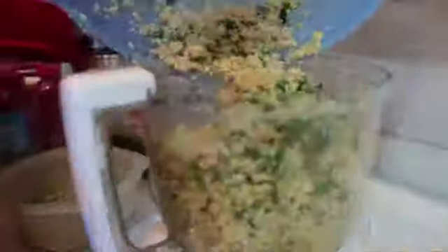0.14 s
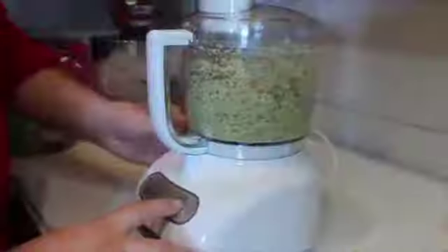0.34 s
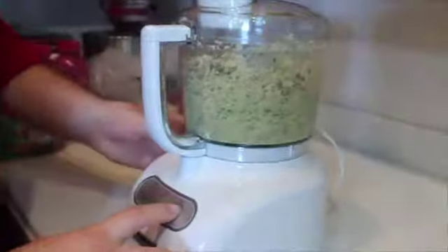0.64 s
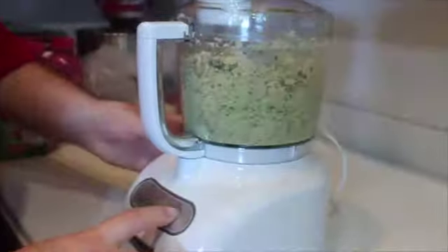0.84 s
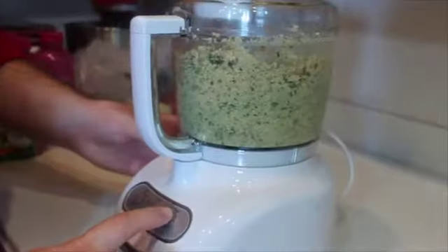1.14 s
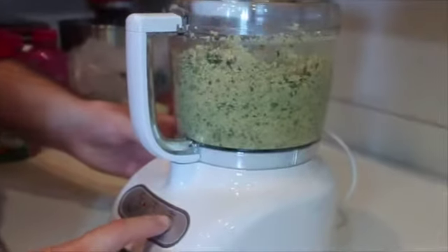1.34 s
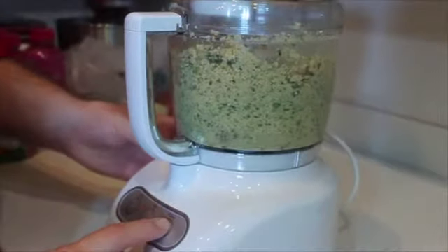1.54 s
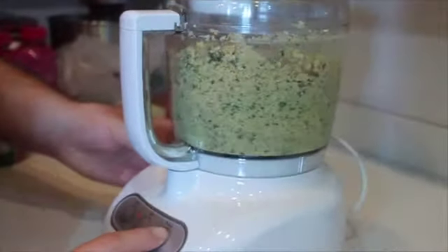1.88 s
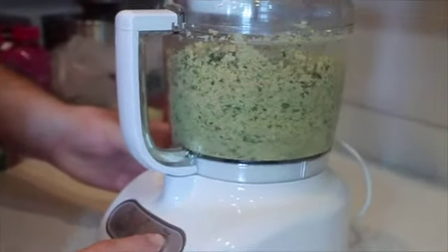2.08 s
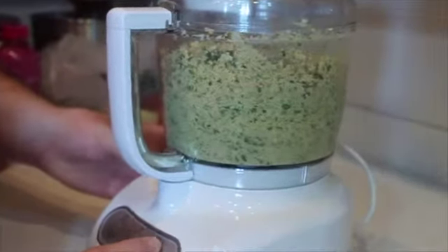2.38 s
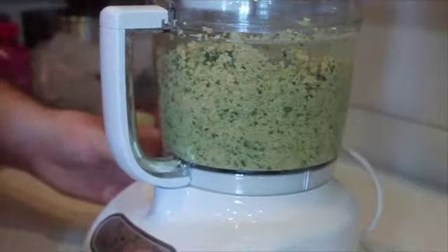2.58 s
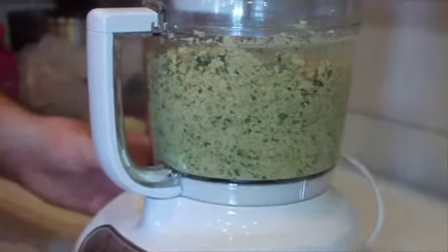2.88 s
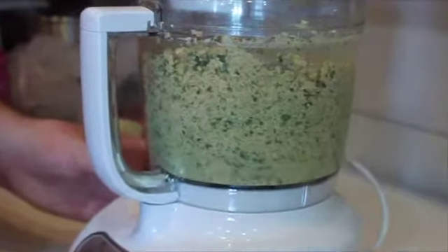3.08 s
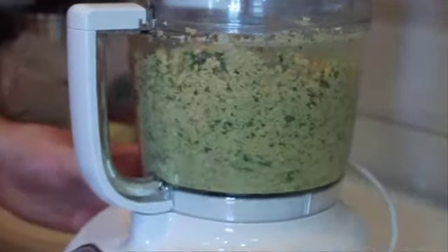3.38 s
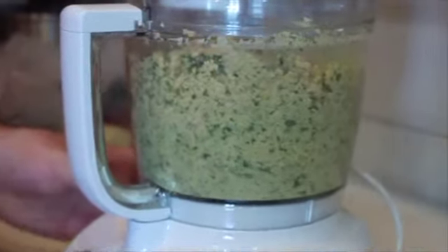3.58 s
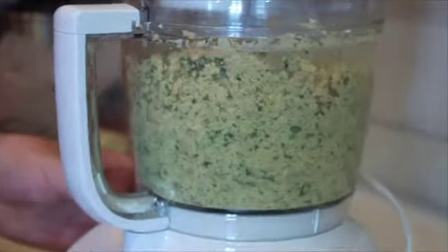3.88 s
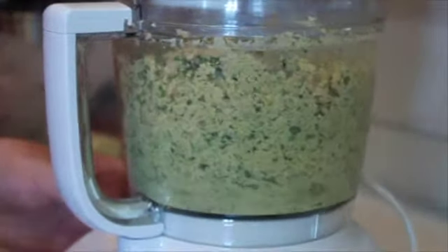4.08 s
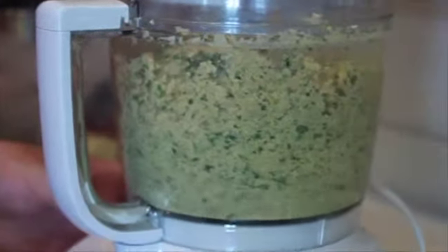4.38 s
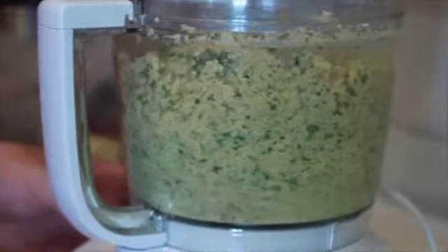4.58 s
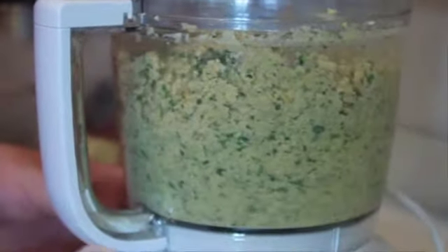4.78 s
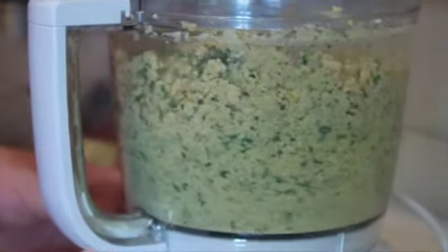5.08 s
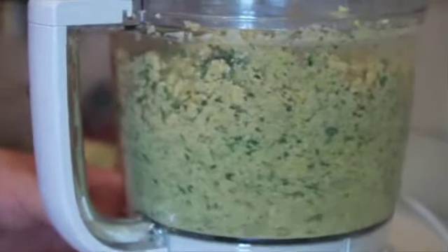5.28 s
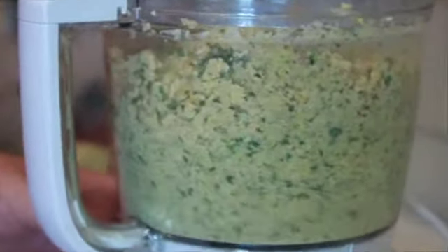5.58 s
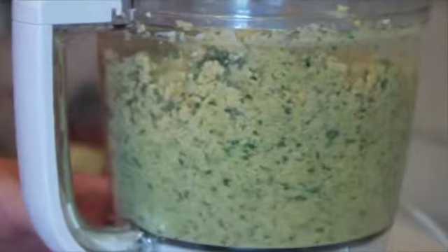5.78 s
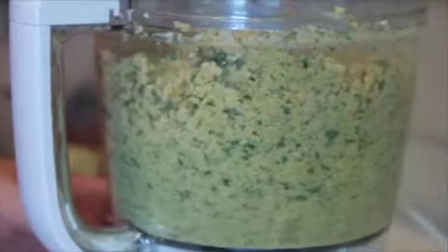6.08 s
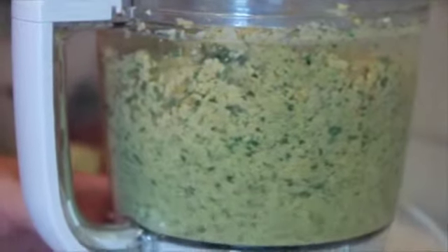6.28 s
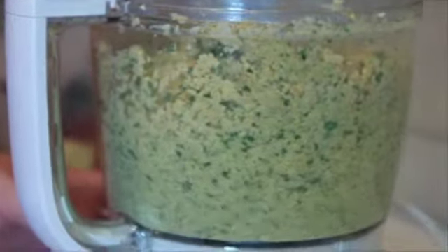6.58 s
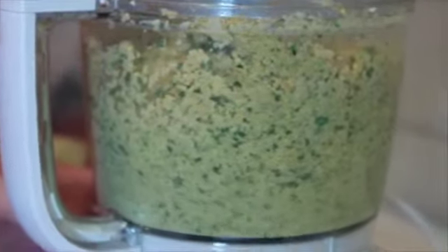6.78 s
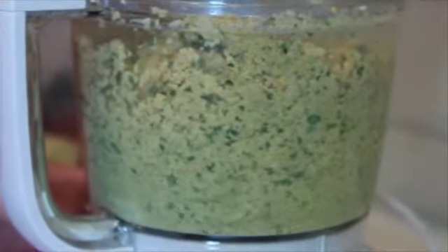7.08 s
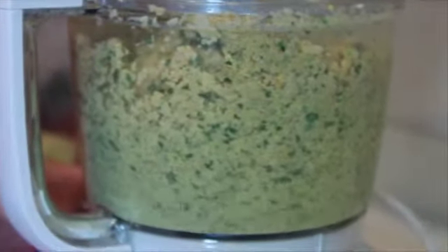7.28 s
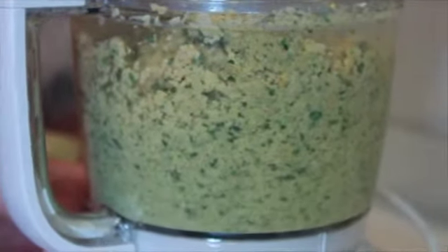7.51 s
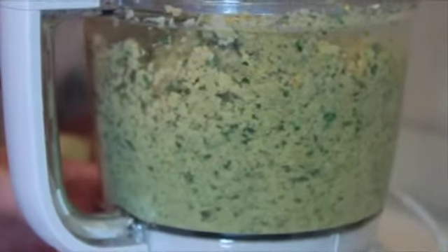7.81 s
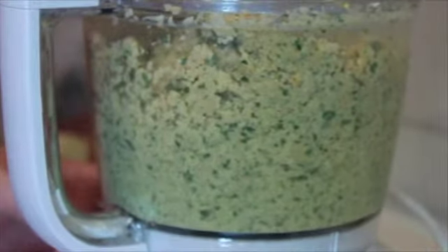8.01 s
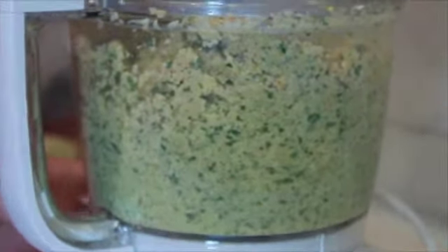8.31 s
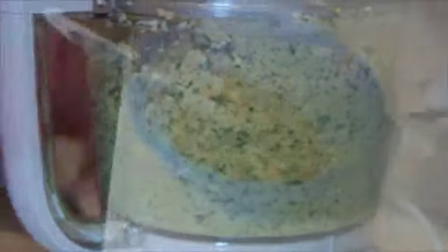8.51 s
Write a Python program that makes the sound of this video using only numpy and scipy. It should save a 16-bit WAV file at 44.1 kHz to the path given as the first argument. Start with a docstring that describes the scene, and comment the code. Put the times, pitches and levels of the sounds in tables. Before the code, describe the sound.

In a small tiled kitchen, soft utensil scrapes and knocks come first, then a food processor is pulsed three times, each burst starting with a button click and a low groan and sagging as the blade coasts down. A fourth start holds as a steady hum, whine and gritty chopping roar. A loud click cuts it off, leaving a brief run-down, small ticks and quiet room noise. Close microphone, same sound in both channels.

```python
"""A food processor with an induction motor is pulsed three times, then latched on, in a small tiled kitchen.
The blade flings a crumbly mixture at the plastic bowl: random impacts on noise excite the bowl's resonances.
The stator hums at multiples of twice the mains rate, rotor slots whine, and base and housing shake as noise.
Buttons click at starts and stops; between pulses the blade coasts down. Ticks, knocks, a few thin high tones
and room noise surround it. One microphone feeds both channels."""
import sys
import numpy as np
from scipy import signal
from scipy.fft import rfft, irfft, next_fast_len
from scipy.io import wavfile
from scipy.ndimage import uniform_filter1d

SR = 44100
rng = np.random.default_rng(int(sys.argv[2]) if len(sys.argv) > 2 else 0)


def output_pcm(signal):
    """Save a mono or channel-first signal as 16-bit PCM at the path in sys.argv[1].

    Samples are clipped to [-1, 1] before scaling.
    """
    pcm = np.clip(np.atleast_2d(signal).T, -1, 1) * 32767
    wavfile.write(sys.argv[1], SR, np.round(pcm).astype(np.int16))


N = 381465
TIME = np.arange(N) / SR
MAINS_HZ = 60


def amp(db):
    """Level law: decibels to amplitude gain."""
    return 10 ** (np.asarray(db) / 20)


def unit(x):
    """Normalisation: scale to rms 1."""
    return x / np.sqrt(np.mean(x ** 2) + 1e-20)


def in_time(rows):
    """Linear interpolation: columns of a table joined in time."""
    seconds, *columns = np.transpose(rows)
    return [np.interp(TIME, seconds, column) for column in columns]


def drift(rate_hz):
    """Slow random fluctuation: noise through a two-pole low-pass, rms 1."""
    step = 40  # samples between computed points
    r = np.exp(-2 * np.pi * rate_hz * step / SR)
    noise = rng.standard_normal(N // step + 2002)
    slow = signal.lfilter([1], [1, -2 * r, r * r], noise)[2000:]  # without the filter's onset
    return np.interp(np.arange(N) / step, np.arange(len(slow)), unit(slow))


def resonate(x, hz, width_hz):
    """Damped resonance: a two-pole filter with gain close to 1 at its peak."""
    r = np.exp(-np.pi * width_hz / SR)
    numerator = [(1 - r * r) / 2, 0, (r * r - 1) / 2]
    denominator = [1, -2 * r * np.cos(2 * np.pi * hz / SR), r * r]
    return signal.lfilter(numerator, denominator, x + 1e-18)


def through(x, modes):
    """Modal superposition: parallel resonances with alternating signs."""
    return sum(amp(db) * resonate(x, hz, width) * (-1) ** k for k, (hz, width, db) in enumerate(modes))


def colour(sources, spectrum, patchy_db):
    """Band synthesis: third-octave bands dealt from two sources, each with its level and flicker; rms 1."""
    hz, db = np.transpose(spectrum)
    out = 0
    edges = 22 * 2 ** np.arange(0, 9.7, 1 / 3)
    for k, (low, high) in enumerate(zip(edges, edges[1:])):
        if low > hz[0] / 1.3 and high < hz[-1] * 1.3:
            bandpass = signal.butter(2, [low, high], "band", fs=SR, output="sos")
            band = signal.sosfilt(bandpass, sources[k % 2])
            centre_db = np.interp(np.log(low * high) / 2, np.log(hz), db)
            out = out + band * amp(centre_db + patchy_db * drift(13.4))
    return unit(out)


def highpass(x, order, hz):
    """Spectral tilt: a Butterworth high-pass."""
    return signal.sosfilt(signal.butter(order, hz, "high", fs=SR, output="sos"), x)


def tone(hz, db, waver_db, slip=0, locked=False):
    """Amplitude-modulated sinusoid: slip (cycles) blurs its pitch; locked lines start at a peak together."""
    phase = hz * TIME + (not locked) * rng.random() + slip
    return np.sqrt(2) * amp(db + waver_db * drift(3.0)) * np.cos(2 * np.pi * phase)


def burst(start_s, t60, rise=1e-4):
    """Exponential decay: noise that swells from start_s (rise is a time constant in s) and dies away."""
    out, start = np.zeros(N + SR), int(start_s * SR)
    age = TIME[:SR // 2]
    envelope = (1 - np.exp(-age / rise)) * amp(-60 * age / t60)
    out[start:start + SR // 2] = envelope * rng.standard_normal(SR // 2)
    return out[:N]


# Spectrum of the room noise. Each row: frequency in Hz, relative density in dB per Hz.
ROOM_SPECTRUM = [(15, -53), (25, -31), (48, -11), (296, 0.5), (330, -16.5), (422, -1), (510, -9.5),
                 (584, -9.5), (1010, -14), (1360, -12), (1680, -17.5), (4360, -24), (16500, -39)]
# Kitchen background over time. Each row: time in seconds, room noise level in dB, treble hiss level in dB.
ROOM_LEVEL = [(0, -79, -88), (.1, -87.5, -86), (.325, -83.5, -100), (.33, -62, -87), (2.8, -63, -84),
              (3.8, -62, -77), (7.4, -82, -90), (7.9, -69.5, -82), (8.2, -63.5, -88), (8.38, -63.5, -76),
              (8.5, -62.5, -68), (8.65, -62.5, -69)]


def background():
    """Broadband ambient noise: room noise, a mains hum from another appliance and a faint hiss."""
    level_db, treble_db = in_time(ROOM_LEVEL)
    hiss = unit(highpass(rng.standard_normal(N), 1, 3500))
    hum = tone(MAINS_HZ, -10, 0.92)  # dB relative to the room noise
    room = colour(rng.standard_normal((2, N)), ROOM_SPECTRUM, patchy_db=1.4)
    return amp(level_db) * (room + hum) + amp(treble_db) * hiss


def kitchen(x):
    """Reverberation by recirculation: eight feedback delays solved in frequency, treble dying sooner."""
    size = next_fast_len(N + SR)
    w = np.linspace(0, np.pi, size // 2 + 1)  # radians per sample
    t60 = 1 / (1 + 2.7 * w)  # seconds; 1 s at the lowest frequency
    lags = rng.uniform(.012, .035, 8) * SR
    loops = [amp(-60 * lag / SR / t60) * np.exp(-1j * w * lag) for lag in lags]
    response = sum(g / (1 - g) * (-1) ** k for k, g in enumerate(loops))
    return irfft(rfft(x, size) * response, size)[:N]


# Dry ticks of crumbs and plastic. Each row: start in seconds, level in dB before the high-pass.
TICKS = [(1.237, -48), (1.3204, -59), (2.4924, -64), (2.6184, -54), (3.758, -47), (7.7258, -62),
         (7.9029, -61.5), (7.9924, -64), (8.0012, -60.5), (8.0057, -54), (8.0341, -67), (8.0795, -64),
         (8.0884, -67), (8.105, -54), (8.1509, -61), (8.173, -51)]


def ticks():
    """Impulsive excitation: noise of 11 ms decay, high-passed to a bright tick."""
    return highpass(sum(amp(db) * burst(s, 0.011) for s, db in TICKS), 2, 4500)


# Soft knocks and scrapes of utensils. Each row: start in seconds, level in dB before the resonances,
# centre in Hz, width in Hz, rise time constant in seconds, 60 dB decay time in seconds.
KNOCKS = [(.005, -52, 480, 200, 0.0063, 0.12), (.055, -44, 1600, 900, 0.017, 0.1),
          (.06, -45, 2520, 900, 0.014, 0.082), (.065, -58, 6900, 1500, .012, .09),
          (.135, -66, 2800, 2500, 0.017, 0.17), (.21, -58, 1700, 700, 0.012, .12),
          (.27, -52, 500, 400, .005, 0.087), (.27, -54, 1400, 1500, 0.0042, 0.059),
          (1.354, -41, 2560, 1200, 0.00074, 0.05), (2.712, -45, 1840, 1790, .004, 0.25),
          (3.522, -36.5, 2050, 1500, .001, 0.15), (7.682, -42, 2180, 2000, 0.0022, 0.046),
          (8.173, -40.5, 1310, 1200, 0.0005, 0.024), (8.367, -53, 1500, 2500, .003, 0.11)]


def knocks():
    """Damped body response: short noise twice through one broad resonance."""
    out = 0
    for s, db, hz, width, rise, t60 in KNOCKS:
        once = resonate(burst(s, t60, rise), hz, width)
        out = out + amp(db) * resonate(once, hz, width)
    return out


# Button and latch clicks. Each row: start in seconds, body level in dB and crack level in dB (both before
# the modes), 60 dB decay time of the body burst in seconds.
BUTTONS = [(0.326, -39, -55, 0.13), (1.0122, -44, -36, 0.075), (1.45, -31.5, -38.5, 0.079),
           (2.242, -42, -34, 0.066), (2.868, -28.5, -41, 0.087), (3.3903, -34, -37, 0.14),
           (3.9055, -31, -37, 0.13), (3.9726, -21, -32, 0.038), (7.4397, -15.5, -24.5, 0.028)]
# Plastic modes rung by the snap. Each row: frequency in Hz, width in Hz, relative gain in dB.
BUTTON_MODES = [(700, 270, -14), (1240, 200, 0), (1840, 440, -4), (2510, 290, 3.5), (3280, 510, -3.5),
                (4400, 1540, -9.5)]
# Modes of the bright crack. Each row: frequency in Hz, width in Hz, gain in dB.
CRACK_MODES = [(6900, 2900, 4.5), (10000, 2800, 2), (13700, 1500, 6.5)]


def buttons():
    """Modal impact response: a snap rings the plastic modes and a shorter bright crack rides on top."""
    snap = sum(amp(db) * burst(s, t60) for s, db, crack_db, t60 in BUTTONS)
    crack = sum(amp(crack_db) * burst(s, 0.37 * t60) for s, db, crack_db, t60 in BUTTONS)
    return amp(6.5) * through(snap, BUTTON_MODES) + through(crack, CRACK_MODES)


# Motor current on and off. Each row: on in seconds, off in seconds, hum build-up time constant in seconds,
# bowl ring while coasting in dB, time to bring the blade to speed in seconds, level offset on reaching full
# speed in dB, start surge of the hum near 360 Hz in dB, start groan in dB, level step at switch-off in dB,
# coast-down loss in dB per second, delay of the groan peak in seconds, deep shudder in dB,
# base rumble in dB, coarse rattle in dB.
POWER = [(0.326, 1.007, 0.033, -30, .11, 0, -56, -46, 5, 61, 0.1, -49, -51, -12.5),
         (1.451, 2.261, 0.089, -30, 0.11, 0.5, -48, -42, 1, 42, 0.098, -47, -50, -11),
         (2.871, 3.389, 0.024, -30, 0.092, 0.4, -50, -40, 0.8, 41, 0.065, -44, -51.5, -12),
         (3.903, 7.439, 0.24, 0, 0.14, -2.5, -49.5, -50, -5.5, 35, 0.05, -61, -52.5, -20)]


def cycle_settings():
    """Piecewise-constant control: at each sample, the columns of the latest switch-on."""
    latest = np.searchsorted([row[0] for row in POWER], TIME) - 1
    return np.transpose(POWER)[:, np.maximum(latest, 0)]


def powered(rises, fall_s):
    """Exponential relaxation: climbs after each switch-on, dies after each switch-off."""
    out = np.zeros(N)
    for (on, off, *_), rise in zip(POWER, np.broadcast_to(rises, len(POWER))):
        climb = (TIME > on) * (1 - np.exp(-np.abs(TIME - on) / rise))
        out += climb * np.exp(-np.maximum(TIME - off, 0) / fall_s)
    return out


def coast_change(off, step_db, loss):
    """Level decay in dB: a quick step, up or down, at switch-off, then a fall that slows."""
    coast = np.maximum(TIME - off, 0)
    early_db = -14.5 * (1 - np.exp(-coast / 0.13))
    return step_db * np.minimum(coast / 0.018, 1) + early_db - loss * coast


# Thin high tones that throb after the last stop. Each row: frequency in Hz, rms level in dB before the throb.
THIN_TONES = [(6062, -87), (6810, -85), (7176, -95), (7940, -95), (8705, -93), (10584, -98), (12107, -95),
              (12473, -92), (13620, -93), (13986, -89)]


def thin_tones():
    """Common amplitude modulation: fixed high tones switch on and off in step, 16.7 times a second."""
    swing = np.cos(2 * np.pi * 16.7 * (TIME - 7.622))  # peaks at 7.622 s
    throb = np.clip(1.5 * swing + .6, 0, 1)
    heard = (TIME > POWER[-1][1]) * (TIME < 7.94)
    return heard * throb * sum(tone(hz, db, 1.2) for hz, db in THIN_TONES)


# Spectrum of the base on the counter. Each row: frequency in Hz, relative density in dB per Hz.
RUMBLE_SPECTRUM = [(40, -19), (70, -16.5), (105, -6.5), (150, -9), (300, 2), (420, -5.5), (470, -9.5),
                   (560, -8.5), (700, -10.5), (1000, -22)]
RUMBLE_FOLLOWS, GROAN_FOLLOWS = 0.76, 0.94  # share of the level change in dB after switch-off
SURGE_PEAK_S, SURGE_DB_PER_S = 0.067, 154  # the hum near 360 Hz surges once after switch-on
DEEP_LAG_S = 0.036  # a deeper shudder follows the surge


def base_and_housing():
    """Resonant noise: the base shakes the counter, the housing groans and a low hum surges at each start."""
    on, off, _, _, _, _, surge_db, groan_db, step_db, loss, groan_s, deep_db, rumble_db, _ = cycle_settings()
    age = np.maximum(TIME - on, 0)
    change_db = coast_change(off, step_db, loss)
    jolt = amp(step_db - 121 * np.abs(TIME - off))  # centred on switch-off, slopes in dB per s

    # rumble and groan swell randomly with the load
    rumble_gain = amp(rumble_db + RUMBLE_FOLLOWS * change_db + 1.6 * drift(4.2)) + amp(-58) * jolt
    surge_gain = amp(surge_db - SURGE_DB_PER_S * np.abs(age - SURGE_PEAK_S))
    deep_gain = amp(deep_db - SURGE_DB_PER_S * np.abs(age - SURGE_PEAK_S - DEEP_LAG_S))

    # the groan: a kick at switch-on, a peak near full speed, a steady part and a stop jolt
    from_peak = age - groan_s
    swell = amp(groan_db + np.minimum(202 * from_peak, -176 * from_peak))  # slopes in dB per s
    kick = amp(-53.5 - 78 * age)
    groan_gain = amp(-59.5 + GROAN_FOLLOWS * change_db + 1 * drift(1.8)) + amp(-61) * jolt + swell + kick

    rumble = colour(rng.standard_normal((2, N)), RUMBLE_SPECTRUM, patchy_db=1.5)
    groan = unit(resonate(rng.standard_normal(N), hz=756, width_hz=53))
    surge = unit(resonate(rumble, hz=360, width_hz=33))
    deep = unit(resonate(rumble, hz=148, width_hz=37))
    low = rumble_gain * rumble + surge_gain * surge + deep_gain * deep
    return (TIME > POWER[0][0]) * (low + groan_gain * groan)


# Stator hum. Each row: multiple of mains, rms level in dB with current on, waver in dB.
HUM = [(2, -56.5, 0.3), (4, -50, 1.5), (6, -49, 2), (16, -64, 3), (20, -72, 4)]
# Slot whine. Each row: multiple of slot rate, offset in mains multiples, rms level in dB before WHINE_GAIN_DB.
WHINE = [(1, -4, -67), (1, -2, -57), (1, 0, -60), (1, 4, -61), (2, -4, -66), (2, 0, -55), (2, 2, -56),
         (2, 4, -56), (2, 6, -60)]
# Rotor wobble. Each row: mains multiple, rotor multiple, rms level in dB at speed.
WOBBLE = [(0, 2, -75), (0, 3, -76), (2, 1, -64), (2, 2, -67), (4, -1, -66), (16, -7, -65), (16, -6, -64)]
ROTOR_HZ, SLOT_HZ, WHINE_GAIN_DB = 29.0, 1102.7, 0.5


def motor():
    """Magnetic forcing: the tones need current; slot and rotor lines build up more slowly than most hums."""
    slip = 0.076 * drift(3.2)  # cycles
    hum = sum(tone(k * MAINS_HZ, db, waver, locked=True) for k, db, waver in HUM)
    whine = sum(tone(k * SLOT_HZ + m * MAINS_HZ, db + WHINE_GAIN_DB, 1.37, k * slip, locked=True)
                for k, m, db in WHINE)
    wobble = sum(tone(m * MAINS_HZ + k * ROTOR_HZ, db, 1.5) for m, k, db in WOBBLE)
    current = powered([row[2] for row in POWER], 0.0059)
    spin = powered(.15, 0.0098)
    return hum * current + (whine + wobble) * spin


def crumbs(per_s, spread_db):
    """Poisson impacts: two random trains on dense noise, a little stronger on each flux peak."""
    strength_db = spread_db * np.minimum(rng.exponential(1, (2, N)), 3.8)
    hits = (rng.random((2, N)) < per_s / SR) * amp(strength_db)
    beat = 1 + 0.023 * np.cos(2 * np.pi * 2 * MAINS_HZ * TIME)
    return beat * rng.standard_normal((2, N)) * (1 + 1.3 * hits)


# Spectrum of the chopped mixture. Each row: frequency in Hz, relative density in dB per Hz.
CHOP_SPECTRUM = [(260, -40), (450, -5.5), (764, -3.5), (894, -16), (973, -2.5), (1210, -5.5), (1330, -2),
                 (2000, -5), (2400, 3.5), (2710, -3.5), (3400, -1), (3790, 0), (5570, -3), (6290, -7.5),
                 (8000, -8.5), (10400, -81), (17600, -120)]
# Bowl resonances. Each row: frequency in Hz, width in Hz, gain in dB.
BOWL_MODES = [(1654, 92, -4), (1820, 89, 1.5), (2250, 580, 0), (2980, 94, 3.5), (3253, 275, 6),
              (3430, 74, -5.5), (4020, 120, -9.5), (4630, 180, -5.5), (5500, 39, -13), (5720, 82, -2.5)]
# Spectrum of the air hiss. Each row: frequency in Hz, relative density in dB per Hz.
HISS_SPECTRUM = [(2940, 5), (5000, 15), (5610, -92), (6550, 11), (10600, 9), (14600, 1), (16200, 8),
                 (16500, -53)]
CHOP_DB, HISS_DB = -41, -50.5  # at full speed, once the offset has died away
IDLE_CHOP_DB, IDLE_HISS_DB, BITE_S = -13, -16.5, .055  # quieter by this until the blade bites
OFFSET_FADE_S = 0.3  # time constant of the level offset on reaching full speed
HISS_FOLLOWS = 1.18  # share of the level change in dB after switch-off


def mixture():
    """Impact excitation of resonances: crumbs strike the bowl wall, with air hiss."""
    on, off, _, ring_db, full_s, offset_db, _, _, step_db, loss, _, _, _, loose_db = cycle_settings()
    age = np.maximum(TIME - on, 0)
    idle = np.clip((full_s - age) / BITE_S, 0, 1)
    offset = offset_db * (1 - idle) * np.exp(-np.maximum(age - full_s, 0) / OFFSET_FADE_S)
    change_db = coast_change(off, step_db, loss)
    chop_gain = amp(CHOP_DB + IDLE_CHOP_DB * idle + offset + change_db)
    hiss_gain = amp(HISS_DB + IDLE_HISS_DB * idle + offset + HISS_FOLLOWS * change_db)

    grains = crumbs(per_s=300, spread_db=5.0)
    plain = colour(grains, CHOP_SPECTRUM, patchy_db=0.98)
    wall = unit(plain + sum(amp(db) * resonate(plain, hz, width) for hz, width, db in BOWL_MODES))
    # coarse crumbs rattle lower
    wall = wall + amp(loose_db) * unit(resonate(plain, hz=1695, width_hz=440))
    # a slowing blade throws less hard: duller, with one mode left ringing
    dull = unit(resonate(plain, hz=1760, width_hz=1200))
    slow = dull + amp(ring_db) * unit(resonate(plain, hz=2300, width_hz=320))
    fast = np.clip(powered(0.0012, 0.27), 0, 1)
    hiss = colour(grains[::-1], HISS_SPECTRUM, patchy_db=0.5)
    chop = fast * wall + (1 - fast) * slow
    return (TIME > POWER[0][0]) * (chop_gain * chop + hiss_gain * hiss)


# The whole level dips briefly. Each row: start in seconds, end in seconds, depth in dB.
DIPS = [(0.616, 0.681, -4), (1.813, 1.884, -5), (5.415, 5.49, -5.5)]


def scene():
    """Linear superposition of all sources, with the brief dips laid over the sum."""
    hits = buttons() + ticks() + knocks()
    mono = background() + hits + amp(-28) * kitchen(hits) + thin_tones()
    mono = mono + base_and_housing() + motor() + mixture()
    dip_db = sum(db * (TIME > start) * (TIME < end) for start, end, db in DIPS)
    return np.tile(mono * amp(uniform_filter1d(dip_db, size=200)), (2, 1))


def record(dry):
    """Band limitation: a steep low-pass cuts the top, 70 dB down from 4 % above 15800 Hz."""
    lowpass = signal.cheby2(14, 70, 15800 * 1.04, fs=SR, output="sos")
    return signal.sosfilt(lowpass, dry)


dry = scene()
out = record(dry)
output_pcm(out)
```